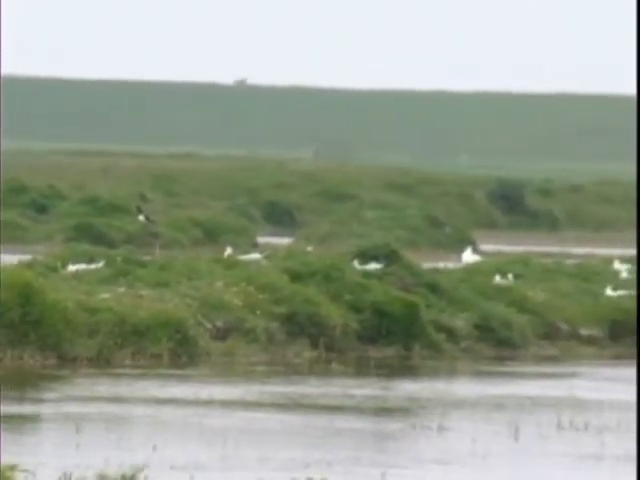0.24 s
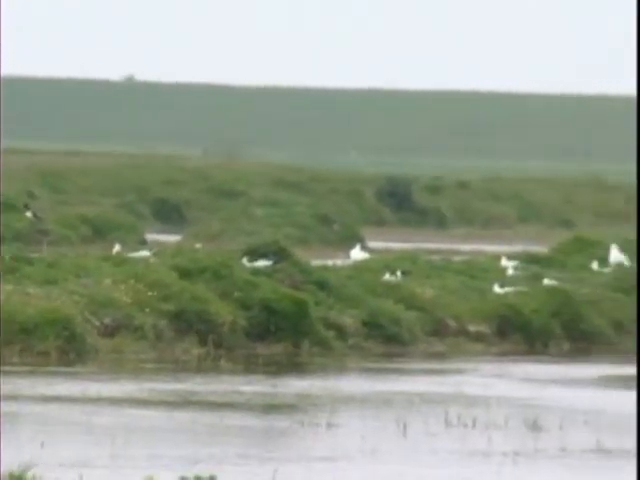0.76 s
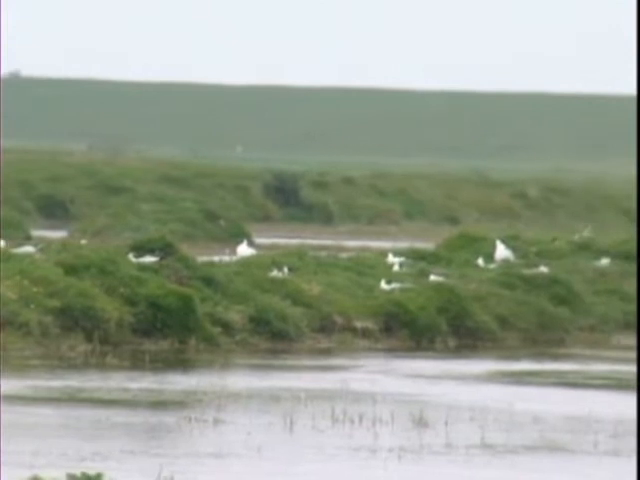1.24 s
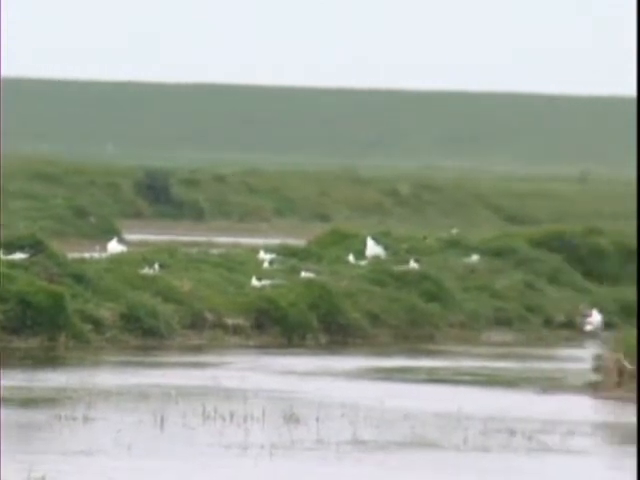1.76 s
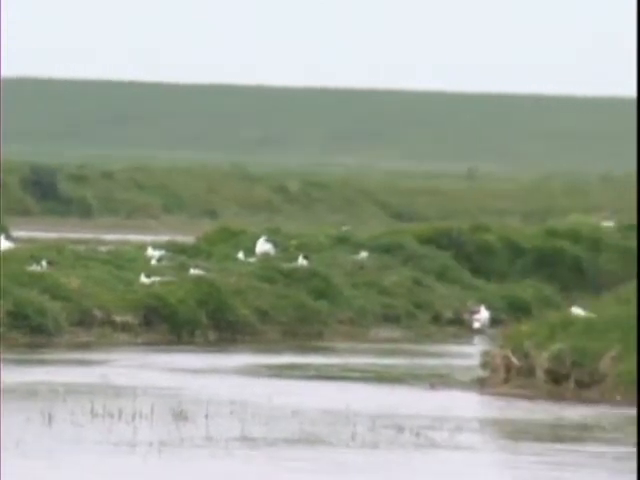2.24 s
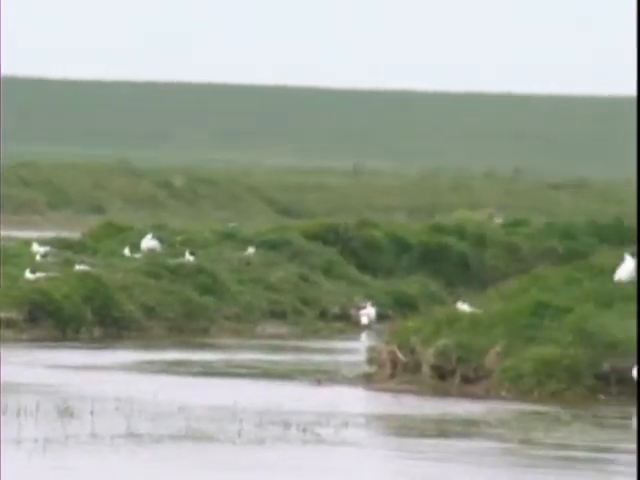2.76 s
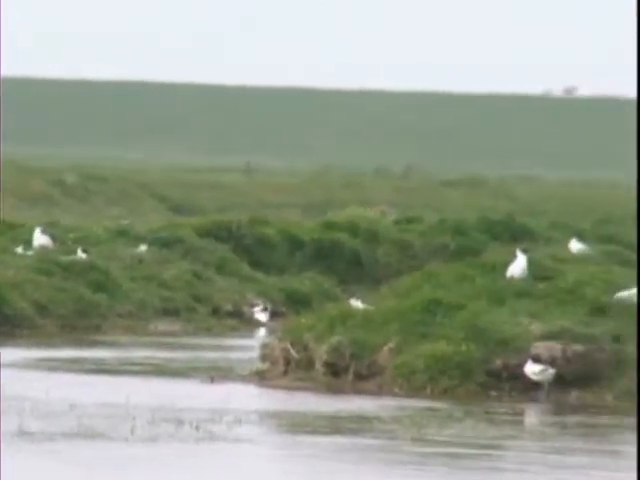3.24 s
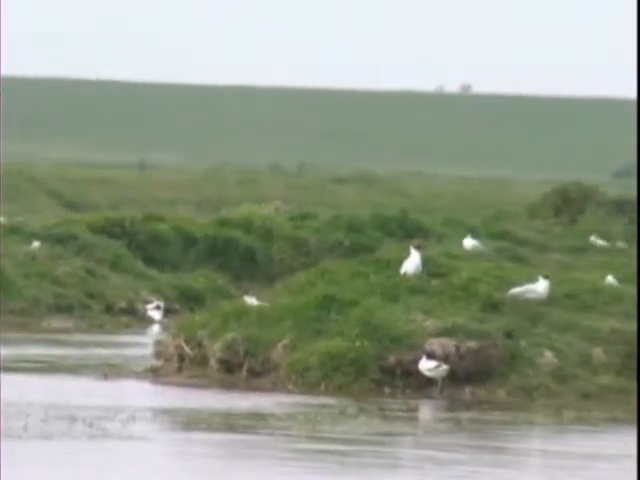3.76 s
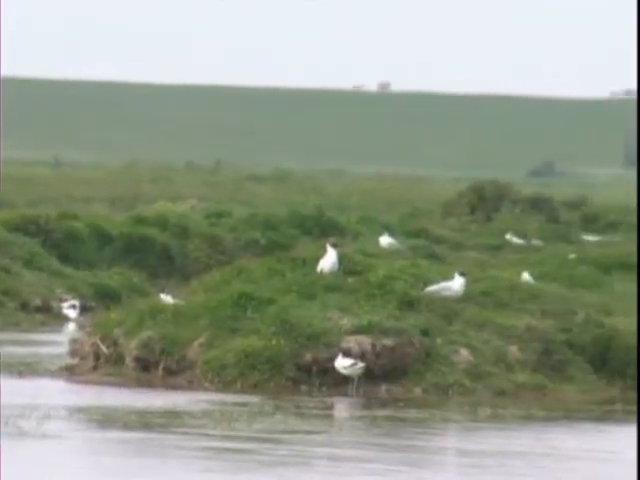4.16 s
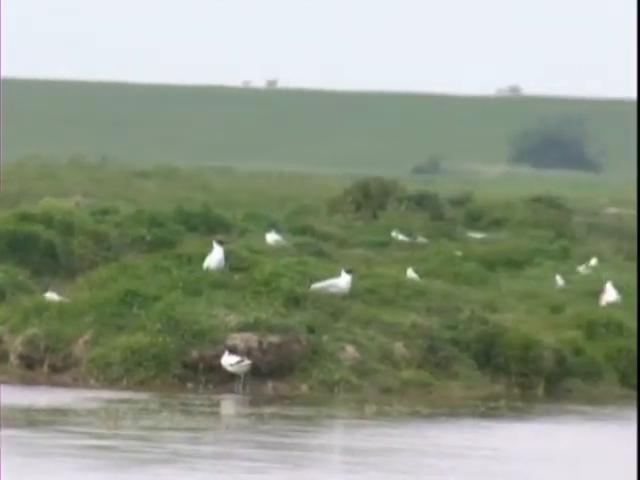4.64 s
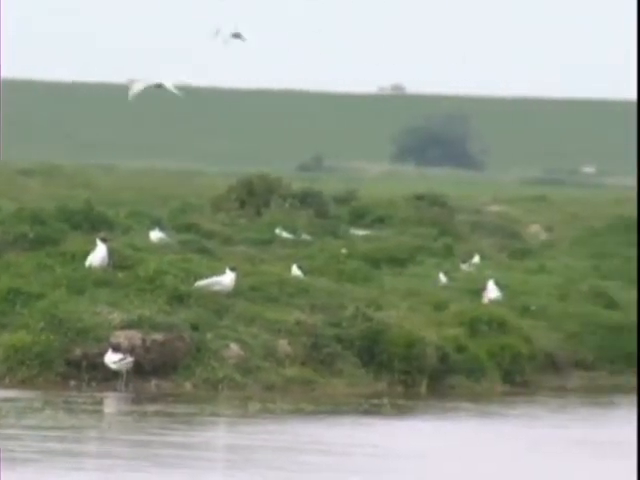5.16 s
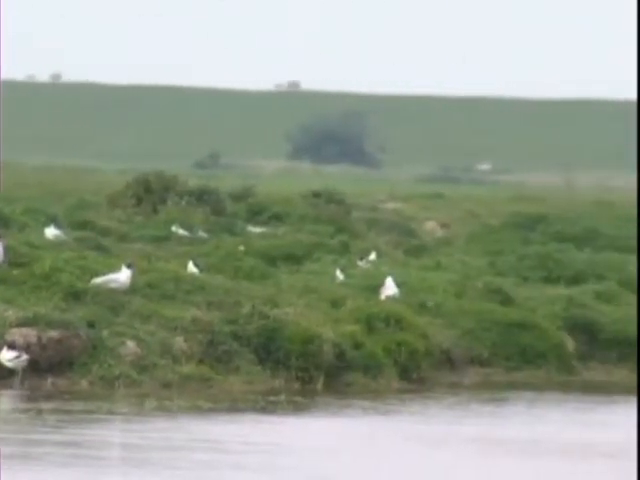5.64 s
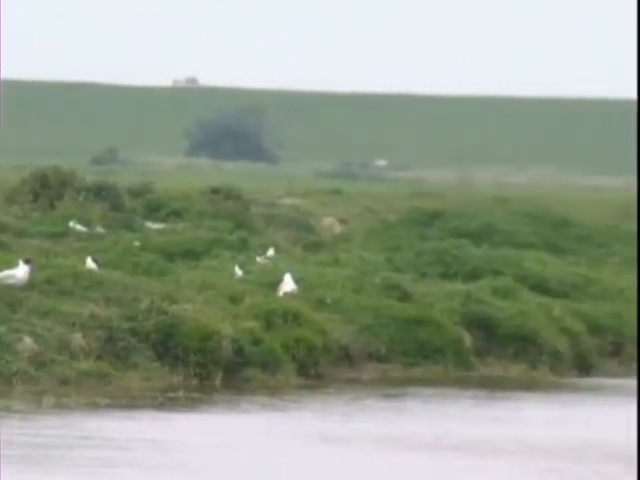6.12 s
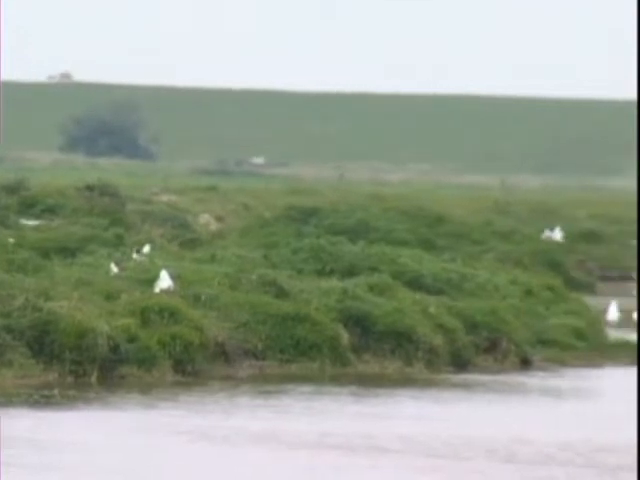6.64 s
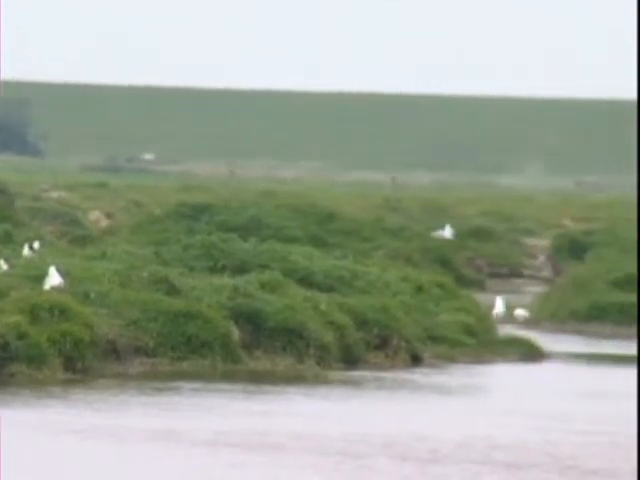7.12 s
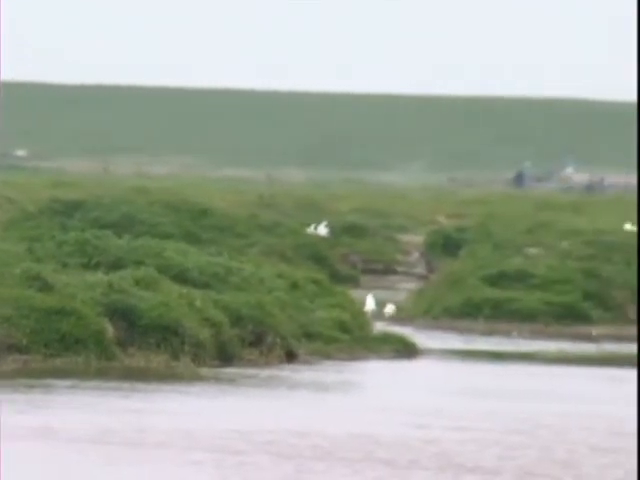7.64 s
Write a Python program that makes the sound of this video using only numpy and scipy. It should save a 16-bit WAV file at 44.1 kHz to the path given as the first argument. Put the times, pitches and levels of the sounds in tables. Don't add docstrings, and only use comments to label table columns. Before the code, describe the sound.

A busy gull and wader colony calls over a marsh pool, with sharp whistles, harsh rasps and piping above low wind rumble on the microphone.

```python
import sys
import numpy as np
from scipy import signal
from scipy.io import wavfile
from scipy.ndimage import uniform_filter1d

SR = 44100
rng = np.random.default_rng(int(sys.argv[2]) if len(sys.argv) > 2 else 0)


def boost_factor(decibels):
    exponent = np.asarray(decibels, float) / 20
    return 10 ** exponent


def materialize(psi):
    bounded = np.clip(np.atleast_2d(psi).T, -1, 1)
    quanta = np.round(bounded * 32767).astype(np.int16)
    wavfile.write(sys.argv[1], SR, quanta)


N = 347508

FAINT_DB, FAINT_FLUTTER_DB = -44.8, 3.5
FAR_DB, FAR_FLUTTER_DB = -49.8, 4.5
PLAIN_THIRD = 0.17


def evened(x):
    return x / np.sqrt(np.mean(x ** 2) + 1e-20)


def add(mix, start_s, sound):
    at = round(start_s * SR)
    sound = sound[max(-at, 0):]
    part = mix[max(at, 0):][:len(sound)]
    part += sound[:len(part)]


def wobble(size, per_s):
    window = int(SR / per_s)
    return evened(uniform_filter1d(uniform_filter1d(rng.standard_normal(size), window), window))


def noise(points, patchy_db):
    hz = np.fft.rfftfreq(1024, 1 / SR)
    point_hz, point_db = np.transpose(points)
    real, imaginary, patches = rng.standard_normal((N // 256 + 5, 513, 3)).T
    patches = evened(uniform_filter1d(uniform_filter1d(patches, 10, 0), 12, 1))
    colour_db = np.interp(np.log(hz + 1), np.log(point_hz + 1), point_db)
    spectrum = (real + 1j * imaginary) * boost_factor(colour_db[:, None] + patchy_db * patches)
    return evened(signal.istft(spectrum, nperseg=1024, noverlap=768)[1][:N])


def wind():
    # pitch_hz, level_db
    rumble = [(18, -39), (30, -42), (81, -4.5), (177, 1.5), (301, -4), (381, -10), (500, -24), (650, -18),
              (1100, -120)]
    # time_s, level_db
    gusts = [(0.0, -60), (0.06, -56.5), (0.37, -62.5), (1.84, -61), (2.02, -57.5), (2.24, -69.5),
             (3.49, -70.5), (4.04, -63), (4.39, -73.5), (4.56, -63.5), (4.61, -69), (5.29, -56.5),
             (5.46, -62), (5.53, -54.5), (5.73, -65), (7.24, -74), (7.86, -59.5), (7.88, -61)]
    gust_db = np.interp(np.arange(N) / SR, *np.transpose(gusts))
    return noise(rumble, patchy_db=1.0) * boost_factor(gust_db + 5.5 + 0.3 * wobble(N, 12.0))


def whistle(start_s, length_s, first_hz, top_hz, last_hz, level_db, octave_db=-32, legs_hz=(0, 0),
            leg_s=.008, bend=3.13, edge_s=0.02, flutter_db=1.5, tilt_hz=0, third=PLAIN_THIRD, release=1):
    t = np.arange(-leg_s, length_s + leg_s, 1 / SR)
    u = np.clip(t / length_s, 0, 1)
    hz = top_hz + (first_hz - top_hz) * (1 - u) ** 4 + (last_hz - top_hz) * u ** 3
    hz = hz - tilt_hz * (t - length_s / 2)
    hz = hz - legs_hz[0] * np.exp(-bend * (t / leg_s + 1))
    hz = hz - legs_hz[1] * np.exp(bend * ((t - length_s) / leg_s - 1))
    hz = hz * (1 + 0.0021 * flutter_db * wobble(len(t), 120))
    turn = 2 * np.pi * np.cumsum(hz) / SR
    overtones = np.sin(2 * turn) + third * np.sin(3 * turn)
    tone = np.sin(turn) + boost_factor(octave_db) * np.sin(np.pi * u) ** .5 * overtones
    edges = np.clip(np.minimum(t + leg_s, (length_s + leg_s - t) / release) / edge_s, 0, 1)
    level = np.sqrt(2) * boost_factor(level_db + flutter_db * wobble(len(t), 120))
    return start_s - leg_s, level * edges * tone


def gull(rows, throat, sweep, rough, closing=0, sharp=3, knee=1, breath=0, unsteady=.12, count=10):
    start_s, *columns = np.transpose(rows)
    t = np.arange(start_s[0], start_s[-1], 1 / SR)
    effort_db, pitch, per_s, depth = (np.interp(t, start_s, c) for c in columns)
    depth = np.clip(depth, 0, 1)
    rattle = np.cumsum(per_s * (1 + unsteady * rough * wobble(len(t), 60))) / SR % 1
    slide = sweep * depth * (.5 ** knee - (1 - rattle) ** knee)
    hz = pitch * (1 + slide + 0.099 * rough * depth ** 2 * wobble(len(t), 506))
    k = np.arange(1, count + 1)[:, None]
    bill = (pitch / pitch.max()) ** closing
    weight = sum(boost_factor(db) / (1 + (2 * (k * hz - f * bill) / width) ** 2) for f, width, db in throat)
    voice = evened((weight * np.sin(k * 2 * np.pi * np.cumsum(hz) / SR + k * k)).sum(0))
    if breath:
        band = signal.butter(3, (4000, 5700), "bandpass", fs=SR, output="sos")
        voice = voice + breath * signal.sosfilt(band, rng.standard_normal(len(t)))
    chop = 1 - depth + depth * np.sin(np.pi * rattle) ** sharp
    voice = evened(voice * chop * (1 + rough * wobble(len(t), 1300)))
    fade = signal.windows.tukey(len(t), min(.05, 600 / len(t)))
    return start_s[0], boost_factor(effort_db + 7.5) * voice * fade


def far_birds(count):
    out = np.zeros(N)
    # centre_hz, width_hz, level_db
    throat = [(1010, 145, -1.5), (1640, 152, 3), (2400, 1430, -1), (4500, 1800, -20.5)]
    shape = [(0, -14.5, .84), (.25, -2, 1), (.6, -6, 0.97), (1, -7.5, .74)]  # share, level_db, pitch_factor
    for slot, (late, long, high, loud, fast, harsh) in enumerate(rng.random((count, 6))):
        start_s = (slot + late) * N / SR / count - .1
        length_s, hz, db = .07 + .25 * long, 600 + 900 * high, -8 * loud
        rows = [(start_s + u * length_s, db + d, hz * p, 50 + 40 * fast, .9) for u, d, p in shape]
        add(out, *gull(rows, throat, sweep=0.28 * harsh, rough=0.304))
        top_hz = (3050, 4500, 4060)[slot % 3] * (.93 + .12 * fast)
        foot_hz = .93 * top_hz
        add(out, *whistle(start_s + .1, 0.0141 + .12 * harsh, foot_hz, top_hz, foot_hz, db - 9,
                          flutter_db=FAR_FLUTTER_DB))
    return out


def marsh(x, t60, start_s=.006):
    t = np.arange(SR // 2) / SR
    taps = rng.choice([-1., 1.], len(t)) * (rng.random(len(t)) < .05)
    taps = taps * (t > start_s) * boost_factor(-60 * t / t60)
    return signal.fftconvolve(x, taps / np.linalg.norm(taps))[:N]


def chorus():
    # pitch_hz, level_db (per Hz)
    wash = [(180, -34), (300, -3.5), (735, -3.5), (1590, 0.5), (2500, -3.5), (2880, -1.5), (3520, -7.5),
            (4480, -7.5), (6490, -21.5), (9000, -48), (11700, -50.5), (19800, -120)]
    # time_s, swell_db
    swell = [(0.0, 0.5), (0.39, 2), (1.01, -3), (1.8, 0.5), (2.07, 2.5), (2.14, -5.5), (2.3, 2), (2.59, 3),
             (3.27, .5), (3.661, 5.5), (4.78, -1), (5.38, 4), (5.68, -2), (6.58, 2), (7.46, 1.5),
             (7.88, -1)]
    # low_edge_hz, high_edge_hz
    edges_hz = [(400, 1400), (1400, 3700), (3700, 7500)]
    # resting_db, share_of_swell
    registers = [(-58.5, 0.52), (-52, 0.89), (-57.5, 1.03)]
    calls = evened(far_birds(count=150))
    crowd = calls + 0.3 * marsh(calls, t60=0.04) + 1.06 * noise(wash, patchy_db=4.0)
    swell_db = np.interp(np.arange(N) / SR, *np.transpose(swell))
    out = np.zeros(N)
    for edges, (resting_db, share) in zip(edges_hz, registers):
        band = signal.sosfilt(signal.butter(3, edges, "bandpass", fs=SR, output="sos"), crowd)
        band /= np.sqrt(uniform_filter1d(band ** 2, 12000))
        out += band * boost_factor(resting_db + share * swell_db + 5.5)
    return out


def near_wader():
    out = np.zeros(N)
    # start_s, length_s, top_hz, level_db
    calls = [(-0.027, 0.069, 2410, -35.5), (0.575, 0.067, 2410, -33), (1.301, 0.069, 2436, -33),
             (1.934, 0.065, 2385, -39), (3.102, 0.059, 2416, -39), (3.808, 0.058, 2376, -32.5),
             (4.465, 0.055, 2383, -38), (5.03, 0.054, 2390, -39.5), (5.162, 0.065, 2366, -41.5),
             (5.82, 0.065, 2385, -33), (6.343, 0.066, 2396, -37), (6.889, 0.058, 2407, -34),
             (7.488, 0.031, 2330, -36)]
    for start_s, length_s, top, db in calls:
        add(out, *whistle(start_s, length_s - .013, top - 200, top, top - 20, db - 1.2, -35, legs_hz=(650, 0),
                          leg_s=0.01, bend=1.5, edge_s=0.011, release=.35))
    return out


def small_whistles():
    out = np.zeros(N)
    # start_s, length_s, top_hz, level_db
    arches = [(.03, .035, 3420, -53), (.425, .03, 5100, -49), (.425, .03, 3420, -50), (5.3, .12, 3090, -53),
              (5.7, .05, 4600, -55), (5.85, .04, 4650, -55), (6.02, .13, 3050, -55), (4.92, .04, 3350, -53),
              (4.91, .05, 4750, -58), (2.54, .055, 2400, -38.5), (4.56, .045, 5150, -58),
              (0.15, 0.033, 3330, -46.5), (.06, .11, 4520, -54), (4.33, .03, 3050, -49),
              (4.73, .1, 6200, -65), (1.481, 0.061, 3050, -51), (4.323, 0.12, 5210, -54.5),
              (4.63, 0.1, 2960, -53), (4.735, 0.087, 4650, -57), (5.397, 0.036, 5200, -54),
              (6.69, .09, 5050, -55), (6.79, .05, 3330, -51), (6.84, .025, 4850, -52),
              (7.5, .055, 6330, -60), (7.585, .075, 3420, -51), (4.97, .08, 2980, -50),
              (7.512, 0.044, 2670, -43), (7.57, 0.13, 5100, -55), (7.575, 0.03, 2580, -34.5),
              (7.69, 0.028, 2926, -39)]
    # start_s, length_s, top_hz, level_db
    risers = [(7.35, .04, 3200, -52), (4.745, .035, 2500, -52), (5.005, .03, 1900, -50),
              (5.06, 0.088, 3050, -49), (7.328, 0.028, 2930, -44), (5.35, .05, 2150, -50),
              (7.14, .05, 4650, -53), (7.35, .03, 4700, -52), (0.625, 0.024, 4560, -50),
              (5.8, 0.13, 2600, -54), (3.76, 0.07, 4550, -57), (4.1, 0.0513, 3050, -44.5),
              (3.522, 0.039, 2080, -40.5), (3.96, 0.1, 4950, -54), (4.414, 0.052, 2250, -46),
              (6.061, 0.04, 4200, -53), (6.31, 0.14, 4320, -54), (6.445, 0.061, 2940, -51),
              (6.887, 0.052, 4400, -50), (7.55, 0.028, 1930, -42.5)]
    # start_s, length_s, top_hz, level_db
    fallers = [(0.038, 0.035, 5010, -50.5), (7.285, .025, 3200, -51), (6.58, .03, 2600, -52),
               (4.53, .03, 1650, -50), (6.18, .02, 3050, -46), (3.549, 0.045, 2543, -39),
               (3.632, 0.062, 1773, -45), (4.488, 0.046, 1780, -47), (5.719, 0.04, 2210, -52),
               (6.397, 0.037, 4420, -53), (6.96, 0.035, 4490, -53)]
    # start_s, length_s, top_hz, level_db
    chips = [(0.9, 0.03, 4500, -52), (1.058, 0.024, 4500, -54), (3.342, .028, 4620, -55),
             (2.17, 0.018, 2690, -40.5), (2.253, 0.026, 5730, -54), (2.168, .028, 5350, -54),
             (2.268, .022, 4600, -53), (3.835, 0.024, 3160, -39), (7.75, 0.015, 3000, -40)]
    # start_s, length_s, top_hz, level_db
    drops = [
        (5.025, .025, 4600, -53),
        (5.62, .012, 5500, -57),
        (5.783, .014, 5100, -56),
        (6.178, 0.035, 5960, -51),
    ]
    # start_s, length_s, top_hz, level_db
    flicks = [(3.591, .016, 2400, -35.5), (4.454, 0.009, 2450, -27), (4.4655, 0.0075, 2500, -28),
              (4.526, 0.0088, 2350, -35.5), (6.288, .014, 5600, -51.5), (5.069, 0.0065, 2580, -33.5),
              (7.556, 0.0245, 2350, -43), (7.6, 0.014, 2700, -42), (7.853, 0.028, 2990, -43.5)]
    # calls, first and last pitch as shares of the top, edge in s
    shapes = [(arches, .93, .93, .015), (risers, .89, 1.03, .017), (fallers, 1.02, .94, .012),
              (chips, .88, .87, .003), (drops, .83, .74, .003), (flicks, .8, 1.05, .0021)]
    for calls, first, last, edge_s in shapes:
        for start_s, length_s, top, db in calls:
            flutter_db = FAR_FLUTTER_DB if db < FAR_DB else FAINT_FLUTTER_DB if db < FAINT_DB else 2
            add(out, *whistle(start_s, length_s, first * top, top, last * top, db, leg_s=.2 * edge_s,
                              edge_s=edge_s, flutter_db=flutter_db))
    return out


def gull_rasps():
    out = np.zeros(N)
    # start_s, length_s, effort_db, pitch_hz, rattles_per_s
    rasps = [
        (.153, .13, -43.5, 550, 69),
        (0.6826, 0.167, -42, 555, 69.5),
        (1.236, 0.165, -43.5, 550, 69),
        (1.7455, .269, -44, 560, 68.7),
        (4.628, .11, -50, 610, 60),
        (5.44, .1, -52, 575, 75),
        (7.383, 0.11, -53.5, 540, 60),
    ]
    # level_db, pitch_factor, rattle_depth (0-1)
    shape = [
        (-17, .8, .4),
        (0, 1, .85),
        (-1, 1.01, .85),
        (-16, .84, .35),
    ]
    # centre_hz, width_hz, level_db
    throat = [(1050, 200, -20), (1630, 330, -3), (2200, 420, 6), (2800, 400, -11), (4600, 700, -13),
              (5750, 940, -14), (7800, 1400, -22)]
    rise_s, fall_s = .052, 0.042
    for start_s, length_s, db, hz, per_s in rasps:
        end_s = start_s + length_s
        times = start_s, start_s + rise_s, end_s - fall_s, end_s
        rows = [(u, db + d, hz * p, per_s, depth) for u, (d, p, depth) in zip(times, shape)]
        add(out, *gull(rows, throat, sweep=.4, rough=.3, sharp=1.6, knee=1.5, breath=.15, unsteady=.06,
                       closing=1, count=17))
    return out


def long_whistles():
    out = np.zeros(N)
    # start_s, length_s, top_hz, level_db
    glides = [
        (.328, .225, 4600, -45),
    ]
    # start_s, length_s, top_hz, level_db
    hooks = [
        (.195, .165, 3380, -48),
        (.225, .135, 5070, -50),
    ]
    for start_s, length_s, top, db in glides:
        add(out, *whistle(start_s, length_s, .95 * top, top, .86 * top, db, legs_hz=(250, 0), leg_s=.01,
                          bend=.8, flutter_db=FAINT_FLUTTER_DB, release=8))
    for start_s, length_s, top, db in hooks:
        add(out, *whistle(start_s, length_s, .97 * top, top, top, db, legs_hz=(0, .07 * top), leg_s=.012,
                          bend=.9, flutter_db=FAINT_FLUTTER_DB, tilt_hz=-700))
    return out


def pipers():
    out = np.zeros(N)
    # start_s, length_s, top_hz, level_db
    pipes = [(0.483, 0.061, 3300, -47), (0.847, 0.079, 3340, -51.5), (1.245, 0.092, 3320, -44.5),
             (1.633, 0.074, 3350, -45.5), (2.014, 0.078, 3294, -44), (2.232, 0.026, 3310, -41),
             (2.39, 0.013, 3230, -37), (2.47, 0.031, 3370, -35), (2.642, 0.037, 3330, -38),
             (2.762, 0.035, 3280, -44), (2.927, 0.096, 3364, -42), (3.145, 0.098, 3358, -36.5),
             (3.318, 0.04, 3340, -47), (3.373, 0.124, 3290, -32.5), (3.642, 0.058, 3330, -33.5),
             (3.753, 0.096, 3270, -49.5), (4.005, 0.034, 3290, -39.5), (4.452, 0.07, 3276, -36.5),
             (3.928, 0.086, 3260, -48.5), (4.138, 0.033, 3293, -41.5), (4.283, 0.073, 3050, -45.5),
             (4.373, 0.038, 3480, -48.2), (4.784, 0.094, 3257, -40.5), (5.759, 0.025, 3260, -45),
             (5.798, 0.011, 3070, -45.5), (5.83, .04, 3050, -51), (6.698, 0.09, 3235, -49.5),
             (6.842, 0.062, 3210, -54)]
    # start_s, length_s, top_hz, level_db
    bright = [
        (5.154, 0.091, 3260, -43.5),
        (5.532, 0.088, 3274, -42.5),
        (5.913, 0.094, 3260, -42),
        (6.304, 0.093, 3233, -44.5),
        (7.087, 0.095, 3200, -48.5),
    ]
    calls = [(*row, -32, PLAIN_THIRD) for row in pipes]
    calls += [(*row, -58.5 - row[-1], 0.33) for row in bright]
    for start_s, length_s, top, db, octave_db, third in calls:
        faint = db < FAINT_DB or (db < -40.5 and length_s > .06)
        add(out, *whistle(start_s, length_s, top - 60, top - 20, top - 70, db, octave_db,
                          legs_hz=(800, 950), leg_s=.008, bend=1.9, edge_s=.012 if faint else .008,
                          tilt_hz=850, third=third))
    return out


def far_trills():
    out = np.zeros(N)
    # start_s, length_s, effort_db, pitch_hz, rattles_per_s
    trills = [(.85, .14, -59, 2200, 62), (1.16, .09, -59, 1650, 65), (1.3, .12, -64, 700, 60),
              (1.5, .15, -63, 620, 45), (1.88, .14, -63, 720, 60), (4.3, .07, -58, 2600, 70),
              (4.77, .09, -58, 2650, 70), (3.42, .12, -54, 2200, 65), (3.45, .16, -58, 4950, 35),
              (4.14, .1, -60, 1900, 65), (5.92, .1, -60, 2000, 65), (6.09, .09, -60, 2900, 60),
              (6.46, .12, -62, 4950, 42)]
    # share_of_call, level_db, pitch_factor
    shape = [
        (0, -8, .95),
        (.25, 0, 1),
        (.8, 0, 1),
        (1, -8, .97),
    ]
    for start_s, length_s, db, hz, per_s in trills:
        rows = [(start_s + u * length_s, db + d, hz * p, per_s, .9) for u, d, p in shape]
        add(out, *gull(rows, [(hz, 600, 0)], sweep=.06, rough=.25, sharp=1.5))
    return out


def scream_and_wail():
    out = np.zeros(N)
    # time_s, effort_db, pitch_hz, rattles_per_s, rattle_depth (0-1)
    scream = [
        (2.362, -50, 842, 60, 0.07),
        (2.385, -43.5, 961, 74, 0.55),
        (2.45, -38.5, 1040, 78, 0.76),
        (2.6, -40, 976, 69.3, 0.8),
        (2.7, -38.5, 944, 65.5, 0.95),
        (2.8, -40.5, 921, 63.5, 0.98),
        (2.905, -50.5, 863, 60, 1),
    ]
    # centre_hz, width_hz, level_db
    scream_throat = [(1095, 270, -16.5), (1830, 560, 5), (4650, 900, -7), (5800, 700, -24)]
    # time_s, effort_db, pitch_hz, rattles_per_s, rattle_depth (0-1)
    wail = [
        (2.375, -44, 760, 80.3, 0.31),
        (2.4, -47.5, 796, 78.3, 0.96),
        (2.6, -46.5, 780, 73.95, 1),
        (2.64, -57, 775, 70, .8),
        (2.8, -50.5, 765, 66.5, 0.55),
        (2.95, -50, 695.4, 64.85, 0.4),
        (3.152, -50.5, 611, 58.1, 0.65),
        (3.226, -55, 546, 52.34, 0.55),
        (3.275, -59, 475, 54.5, 0.56),
    ]
    # centre_hz, width_hz, level_db
    wail_throat = [(720, 150, -20), (1630, 310, -5), (2265, 127, 14.5), (4680, 880, -1), (5300, 1000, -16)]
    # centre_hz, width_hz, level_db
    chest_throat = [(560, 300, 0), (1450, 220, -4)]
    add(out, *gull(scream, scream_throat, sweep=.3, rough=.17, sharp=1.4, knee=4, breath=.3, unsteady=.04))
    add(out, *gull(wail, wail_throat, sweep=.12, rough=.25, closing=1))
    start_s, chest = gull(wail[4:], chest_throat, sweep=.25, rough=.6)
    add(out, start_s, boost_factor(-14) * chest)
    return out


def plops():
    out, t = np.zeros(N), np.arange(800) / SR
    # start_s, level_db, pitch_hz
    drips = [
        (3.616, -47, 396),
        (3.715, -47.5, 440),
    ]
    for start_s, db, hz in drips:
        bubble = np.sin(2 * np.pi * hz * t * (1 + 8 * t)) * np.exp(-t / 0.0051)
        add(out, start_s, boost_factor(db + 7) * bubble)
    return out


def moan_croak_yelp():
    out = np.zeros(N)
    # time_s, effort_db, pitch_hz, rattles_per_s, rattle_depth (0-1)
    moan = [
        (5.36, -64, 353.6, 62.5, 0.92),
        (5.43, -57.5, 380.4, 61.3, 0.84),
        (5.52, -60, 386, 61.6, .8),
        (5.57, -70, 365, 62, 0.74),
    ]
    # centre_hz, width_hz, level_db
    chest = [(585, 340, -1.04), (1150, 390, -2)]
    # time_s, effort_db, pitch_hz, rattles_per_s, rattle_depth (0-1)
    croak = [
        (5.39, -56, 750, 70, .3),
        (5.41, -50, 775, 70, .4),
        (5.447, -53, 770, 70, .4),
    ]
    # centre_hz, width_hz, level_db
    croak_throat = [(770, 200, -4), (1540, 300, 0), (2320, 300, -1)]
    # time_s, effort_db, pitch_hz, rattles_per_s, rattle_depth (0-1)
    yelp = [
        (5.447, -44, 2040, 90.3, .15),
        (5.46, -40.5, 2100, 88.6, .2),
        (5.488, -34, 2185, 90, 0.2),
        (5.553, -42.5, 1987, 90, .15),
        (5.567, -45, 2120, 90, .15),
    ]
    # centre_hz, width_hz, level_db
    yelp_throat = [(2100, 820, 5.5), (1080, 900, -36)]
    add(out, *gull(moan, chest, sweep=.12, rough=.45))
    add(out, *gull(croak, croak_throat, sweep=.1, rough=.3))
    add(out, *gull(yelp, yelp_throat, sweep=.1, rough=.22))
    return out


def goose(count):
    out = np.zeros(N)
    # centre_hz, width_hz, level_db
    throat = [(330, 200, -3.5), (660, 200, -17), (1010, 280, 5)]
    first_s, spacing_s, hz, db = 6.27, .165, 330, -64
    for s in first_s + spacing_s * np.arange(count):
        rows = [(s, db - 2, .9 * hz, 30, 0), (s + 0.039, db, hz, 30, 0), (s + .07, db - 2, 0.943 * hz, 30, 0)]
        add(out, *gull(rows, throat, sweep=0, rough=0.15))
    return out


def scene():
    near = near_wader() + small_whistles() + gull_rasps() + long_whistles()
    near += pipers() + far_trills() + scream_and_wail() + moan_croak_yelp()
    echoes = boost_factor(-13.0) * marsh(near, t60=0.038)
    live = wind() + chorus() + near + echoes + plops() + goose(count=7)
    return np.array([live, np.zeros(N)])


def low_pass(x):
    return signal.sosfilt(signal.butter(12, 13780, fs=SR, output="sos"), x)


def record(dry):
    # pitch_hz, level_db
    live_hiss = [(60, -17), (300, 4), (1000, -46), (8000, 12), (11000, 6.5), (14000, 3), (20000, -27)]
    # pitch_hz, level_db
    idle_hiss = [(30, -10), (120, -29), (400, -30), (1000, -45), (2500, -68), (5000, -13), (8000, 6),
                 (12000, 2.5), (14000, 2)]
    left = boost_factor(-67) * noise(live_hiss, patchy_db=2.5)
    right = boost_factor(-81) * noise(idle_hiss, patchy_db=4.0)
    return low_pass(dry + np.array([left, right]))


dry = scene()
out = record(dry)
materialize(out)
```